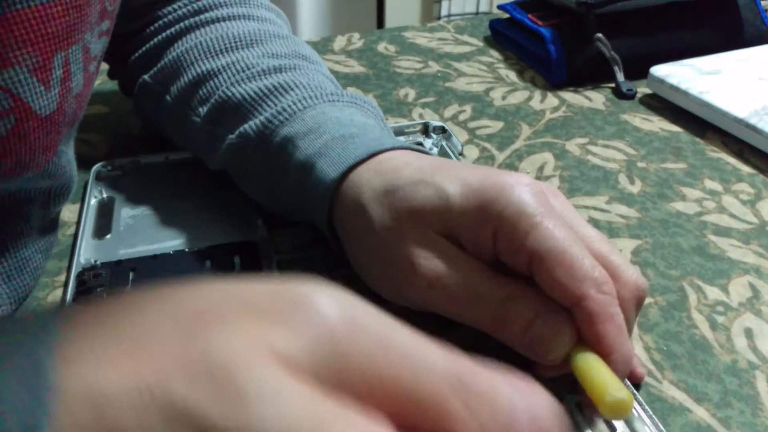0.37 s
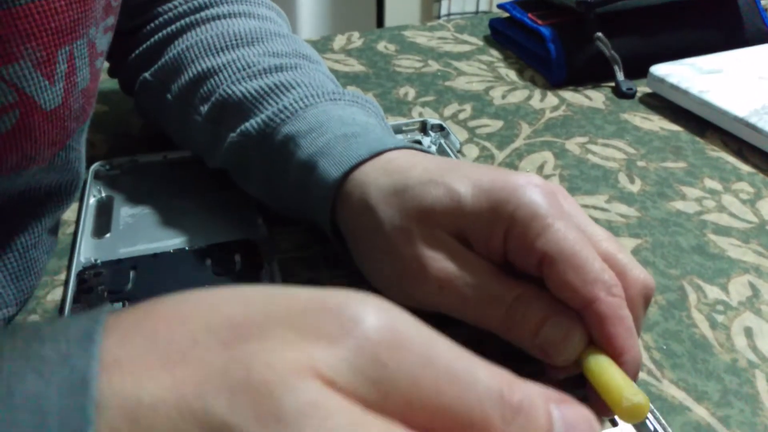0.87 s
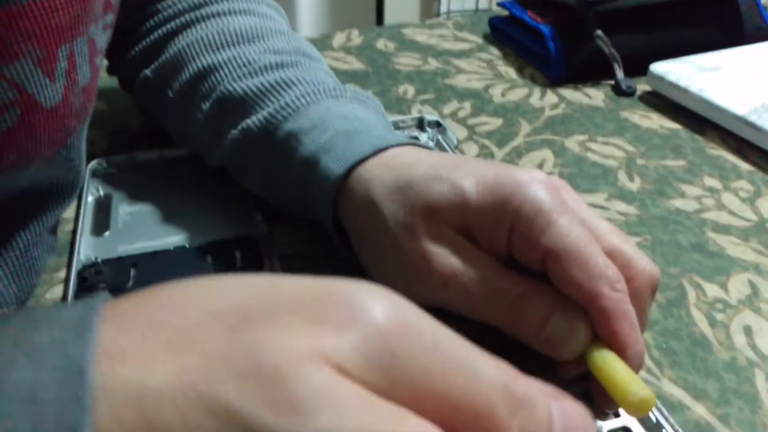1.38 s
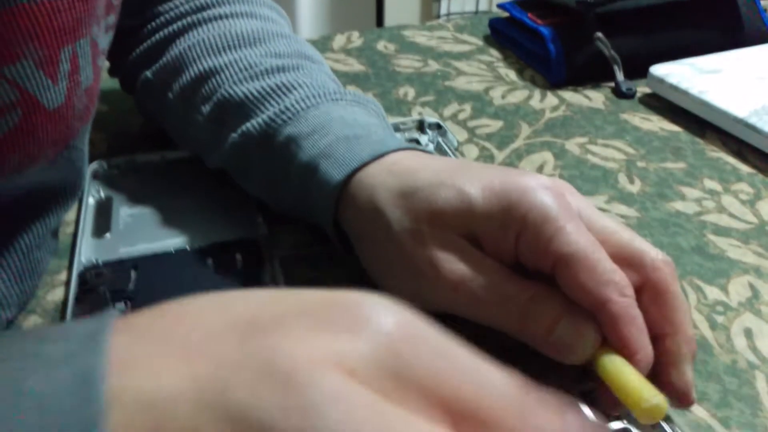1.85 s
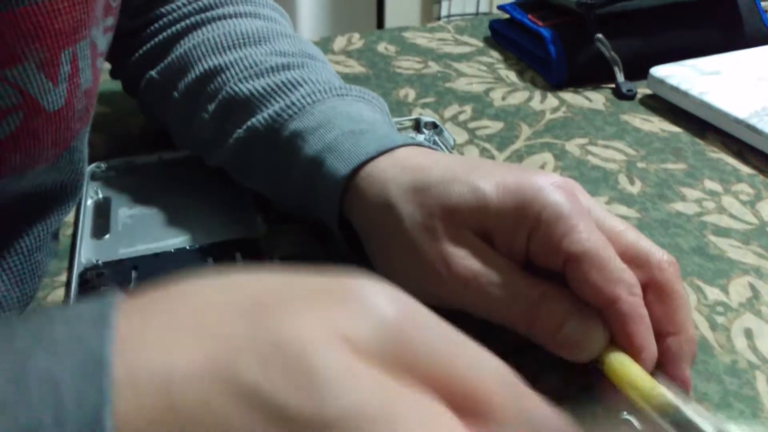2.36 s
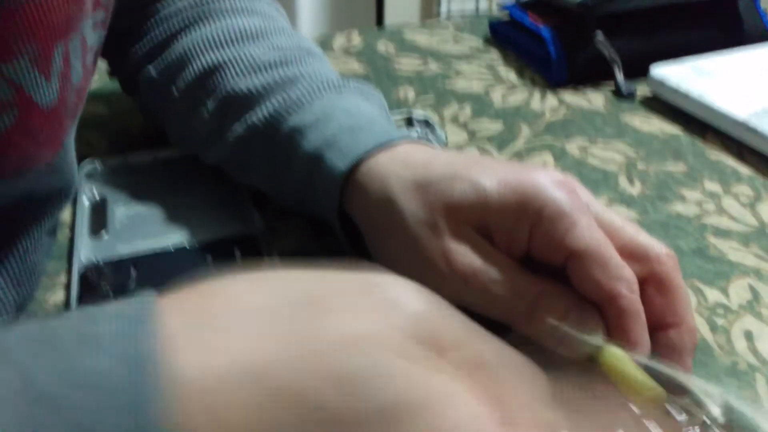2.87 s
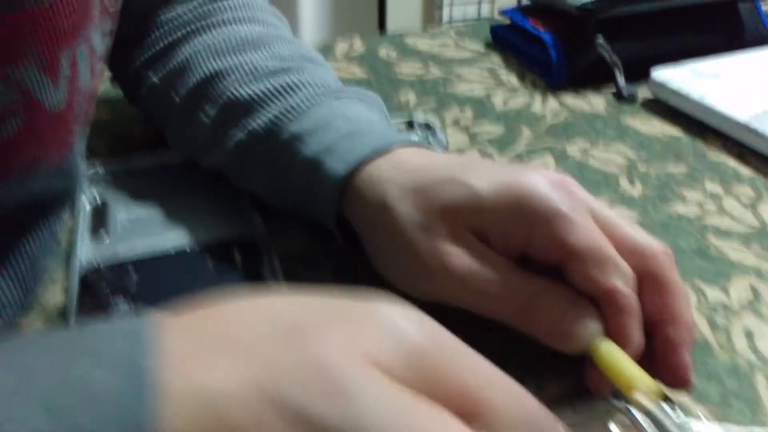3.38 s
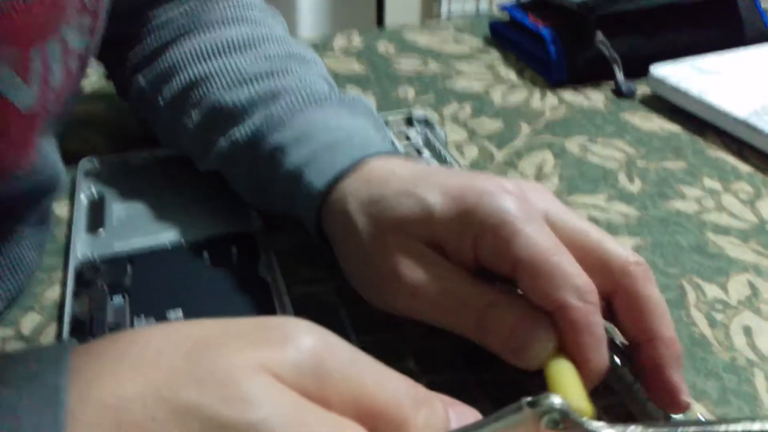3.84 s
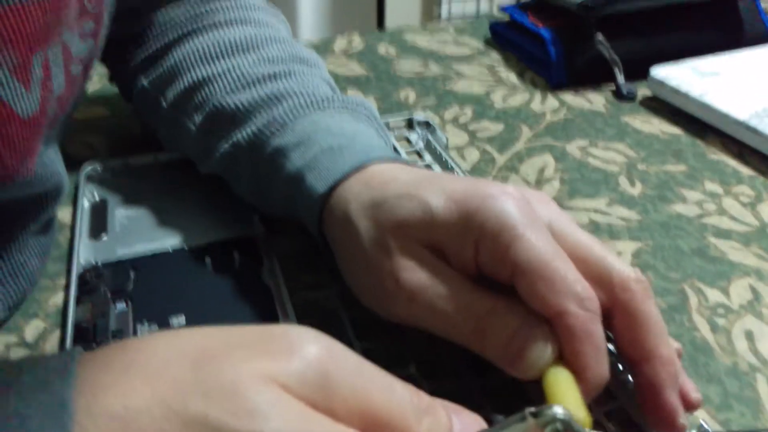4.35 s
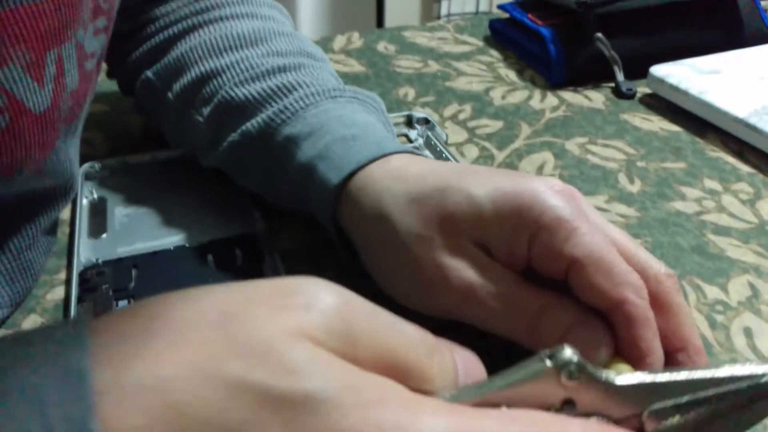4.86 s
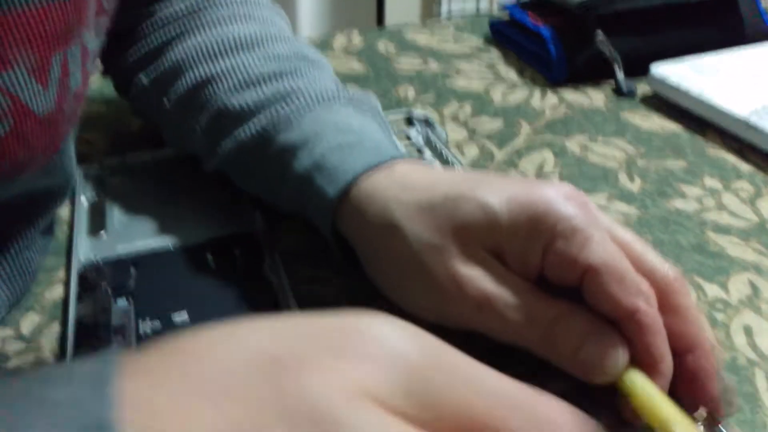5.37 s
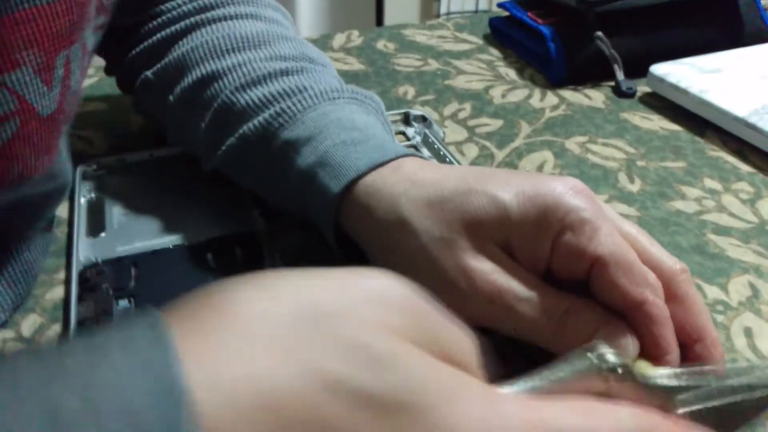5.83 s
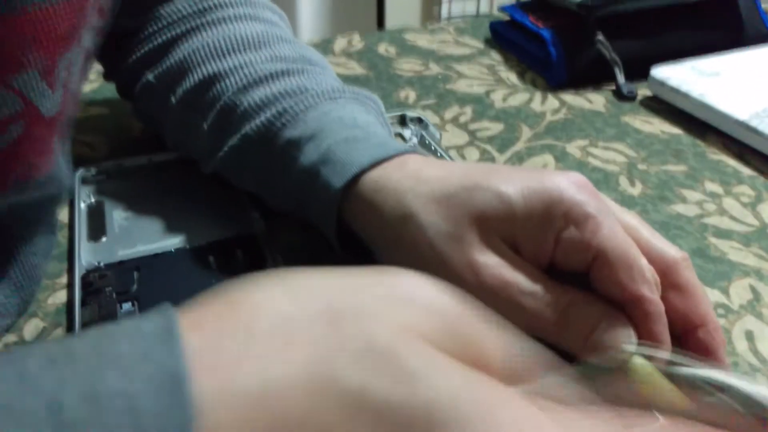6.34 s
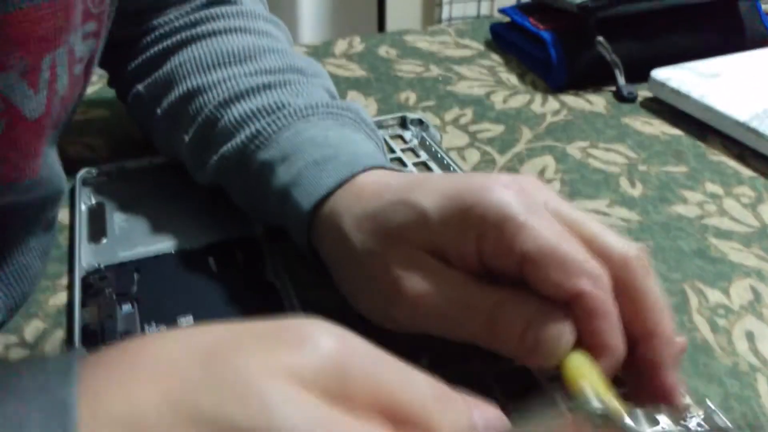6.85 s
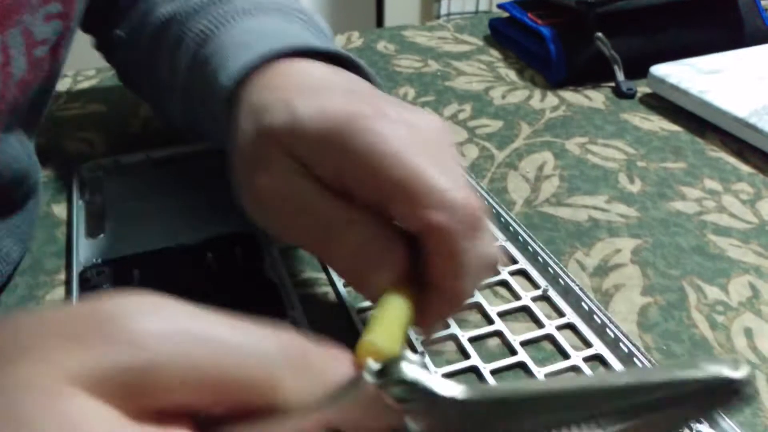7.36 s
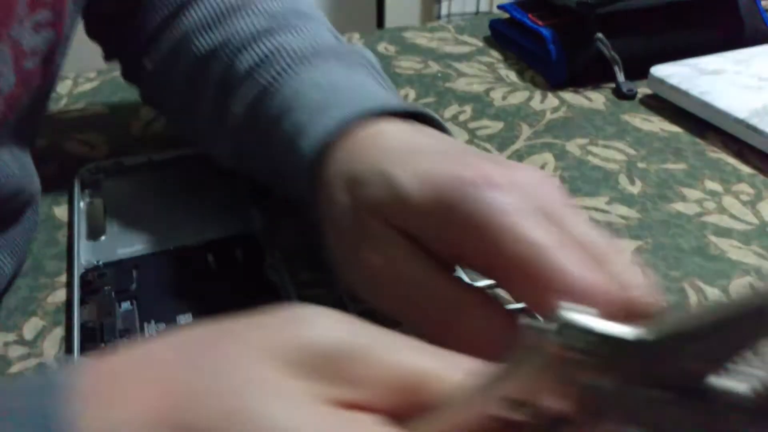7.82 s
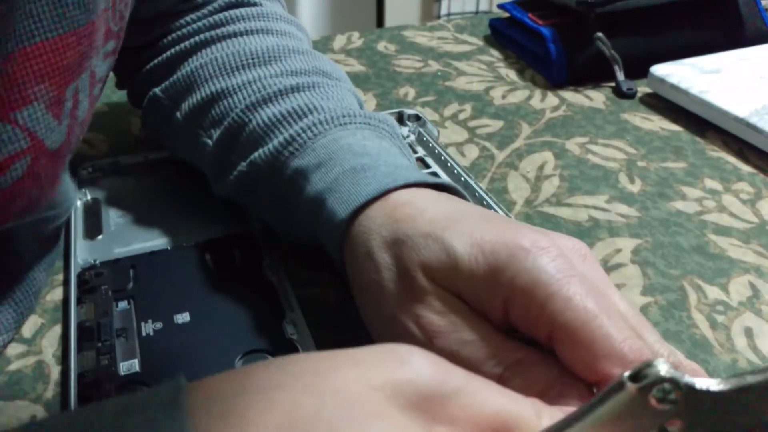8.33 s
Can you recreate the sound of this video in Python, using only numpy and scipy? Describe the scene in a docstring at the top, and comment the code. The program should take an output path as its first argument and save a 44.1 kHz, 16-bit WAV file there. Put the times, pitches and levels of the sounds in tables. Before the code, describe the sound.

Sharp close blows of steel on steel over a cloth-covered table, first spaced, then quickening, a quiet fiddling gap, then four more in a small room.

```python
"""Pliers hammering a punch

Pliers hammer a punch against the rivets of a metal case that lies on a cloth-covered table in a small room.
Each blow is a bright crack, a thud of case and table a moment later and a thin ring of the pliers.
Light clicks and scuffs of handling lie between, over rumble, hiss and hum. Clicks excite decaying modes,
shaped noise makes air and room. The left microphone faces the work; gain control and limiter hold the blows."""
import sys
import numpy as np
from scipy import signal
from scipy.io import wavfile
from scipy.ndimage import uniform_filter1d, minimum_filter1d

SR = 44100
rng = np.random.default_rng(int(sys.argv[2]) if len(sys.argv) > 2 else 0)


def boost_factor(decibels):
    """Convert a level in decibels to a linear amplitude factor."""
    exponent = np.asarray(decibels, float) / 20
    return 10 ** exponent


def unload_wav(signal):
    """Save mono or channel-first audio to the path in sys.argv[1] as 16-bit WAV at rate SR, clipped to [-1, 1]."""
    wavfile.write(
        sys.argv[1],
        SR,
        np.round(np.clip(np.atleast_2d(signal).T, -1, 1) * 32767).astype(np.int16),
    )


N = 373527   # length in samples


def rms_one(x):
    """Scales a sound to an rms of 1."""
    return x / np.sqrt(np.mean(x ** 2) + 1e-20)


def at_hz(points, hz):
    """Reads a curve between its points, along a logarithmic pitch axis."""
    points_hz, values = np.transpose(points)
    return np.interp(np.log(hz), np.log(points_hz), values)


def low_pass(x, hz):
    """Dulls a sound above hz."""
    return signal.sosfilt(signal.butter(2, min(hz, 0.45 * SR), fs=SR, output="sos"), x)


def high_pass(x, hz, order):
    """Thins a sound below hz."""
    return signal.sosfilt(signal.butter(order, hz, "high", fs=SR, output="sos"), x)


def band_pass(x, low_hz, high_hz):
    """Keeps one band of a sound."""
    return signal.sosfilt(signal.butter(2, [low_hz, high_hz], "band", fs=SR, output="sos"), x)


def ring(excitation, hz, t60_s):
    """A resonance: a unit click sets a sine of height 1 ringing, which falls 60 dB in t60_s."""
    decay = boost_factor(-60 / (t60_s * SR))
    turn = 2 * np.pi * hz / SR
    return signal.lfilter([0, np.sin(turn)], [1, -2 * decay * np.cos(turn), decay ** 2], excitation + 1e-18)


def bands(length):
    """Third-octave bands of noise, each an unrelated pair."""
    edges = 20 * 2 ** np.arange(0, 10, 1 / 3)
    white = rng.standard_normal((2, 2, length))
    for k, (low, high) in enumerate(zip(edges, edges[1:])):
        yield np.sqrt(low * high), band_pass(white[k % 2], low, high)


def alike(pair, likeness):
    """Two noises become left and right, 0 unrelated to 1 identical, as the close microphones make them."""
    likeness = np.clip(likeness, 0, 1)
    middle = np.sqrt(1 + likeness) * pair[0]
    side = np.sqrt(1 - likeness) * pair[1]
    return middle + side * [[1], [-1]]


# Colour of the rumble and hiss: pitch_hz [Hz], density_db [relative dB per Hz]
AIR_COLOUR = [(26, -43.5), (45, -7.5), (67, -9), (96, -16.5), (136, -11.5), (264, -20), (401, -21.5),
              (741, -27.5), (996, -27.5), (4240, -36.5), (11600, -39), (14900, -39.5), (16000, -45)]
# Left-right likeness of the rumble and hiss: pitch_hz [Hz], likeness [below 0 plays as 0]
AIR_LIKENESS = [(60, -2.5), (180, 1), (550, -0.44), (1650, 0), (4970, -0.63), (15000, -0.38)]
# The room's low resonances in the rumble: pitch_hz [Hz], width_hz [Hz], level_db [dB rms before right_gain_db]
ROOM_DRONE = [(123.2, 1.5, -66), (188, 10, -79.5), (231, 10, -77), (318, 21, -77.5)]
# Two steady tones that beat: pitch_hz [Hz], level_db [dB rms before right_gain_db]
BEATING_HUM = [(51, -67), (61, -68.5)]


def air():
    """Rumble of the house and hiss are coloured noise; noise-driven resonances drone and two sines beat."""
    air_db = -64.5   # rms of rumble and hiss
    warm_up = SR     # samples in which the filters settle, cut off afterwards
    noise = np.zeros((2, N + warm_up))
    for hz, pair in bands(N + warm_up):
        if hz > 40:
            noise += alike(pair, at_hz(AIR_LIKENESS, hz)) * boost_factor(at_hz(AIR_COLOUR, hz))
    drone = np.zeros(N)
    for hz, width_hz, db in ROOM_DRONE:
        t60_s = np.log(1000) / np.pi / width_hz
        drone += boost_factor(db) * rms_one(ring(rng.standard_normal(N + warm_up), hz, t60_s)[warm_up:])
    hum = np.zeros(N)
    t = np.arange(N) / SR
    for hz, db in BEATING_HUM:
        hum += np.sqrt(2) * boost_factor(db) * np.sin(2 * np.pi * (hz * t + rng.random()))
    return boost_factor(air_db) * rms_one(noise[:, warm_up:]) + drone + hum


# Reverberation time: pitch_hz [Hz], t60_s [s]
ROOM_DECAY = [(60, 0.13), (160, 0.41), (420, 0.34), (1100, 0.37), (2900, 0.33), (7700, 0.36),
              (15000, 0.029)]
# Colour of the reflections: pitch_hz [Hz], level_db [relative dB]
ROOM_TONE = [(60, -14.5), (125, -1.5), (158, -9), (200, 1), (300, 2), (500, 2.5), (1000, 1), (2000, 2),
             (4500, -3.5), (6000, -10.5), (9000, -4.5), (15000, -8.5)]
# Left-right likeness of the reflections: pitch_hz [Hz], likeness [0 to 1]
ROOM_WIDTH = [(60, 0.98), (150, 1), (300, 1), (600, 0.63), (1200, 0.17), (15000, 0.088)]


def room(x):
    """Reflections thicken within a few ms, then each band of the noise echo dies at its own rate."""
    build_s, room_db = 0.0008, 8   # rise of the echo, its energy against the sound sent in
    t = np.arange(SR // 2) / SR
    echo = np.zeros((2, len(t)))
    for hz, pair in bands(len(t)):
        level_db = at_hz(ROOM_TONE, hz) - 60 * t / at_hz(ROOM_DECAY, hz)
        echo += alike(pair, at_hz(ROOM_WIDTH, hz)) * boost_factor(level_db)
    echo *= 1 - np.exp(-(t / build_s) ** 2)
    echo = boost_factor(room_db) * rms_one(echo) / np.sqrt(len(t))
    return signal.fftconvolve(x[None], echo, axes=1)[:, :N]


def far_side(x):
    """The right microphone hears the work later and duller."""
    lag_s, shadow_hz = 0.0001, 2370
    shadow_db, treble_db = -1, -17   # level, and full-range sound let past the dull part
    late = np.interp(np.arange(N) - lag_s * SR, np.arange(N), x)
    return boost_factor(shadow_db) * (low_pass(late, shadow_hz) + boost_factor(treble_db) * late)


# Scuffs of the punch and the hand along the case:
# start_s [s], length_s [s], level_db [dB, grain level at the start], pitch_hz [centre, Hz]
RUBS = [(3.752, 0.12, -70, 520), (3.81, 0.069, -65, 1500), (3.749, 0.13, -65, 4300),
        (4.18, 0.066, -67, 517), (4.369, 0.05, -59, 1220), (4.697, 0.084, -62, 2900),
        (4.909, .07, -59.5, 2700), (6.574, 0.053, -54.5, 2860), (7.078, 0.037, -53, 2570),
        (8.197, 0.049, -65, 1066), (8.275, 0.041, -73, 1070)]


def scuffs():
    """Dense grains fade over each rub and ring a few cycles at its pitch."""
    grains_per_s, fade_db, room_send_db = 1500.0, 11, -10
    ring_cycles = 5.1   # cycles until the ring has fallen 60 dB
    t = np.arange(N) / SR
    grains = rng.standard_normal(N) * (rng.random(N) < grains_per_s / SR)
    out = np.zeros(N)
    for start_s, length_s, db, hz in RUBS:
        progress = (t - start_s) / length_s
        rubbing = (progress >= 0) & (progress < 1)
        stroke = rubbing * boost_factor(db - fade_db * np.clip(progress, 0, 1))
        out += ring(grains * stroke, hz, ring_cycles / hz)
    return np.array([out, boost_factor(room_send_db) * out])


def clicks(times, db):
    """One-sample impulses at the given times and levels."""
    out = np.zeros(N)
    np.add.at(out, np.round(times * SR).astype(int), boost_factor(db))
    return out


def chatter(times, db, length_s, count):
    """A contact is a first tick and weaker ones close behind, the later the weaker."""
    delay = rng.random((len(times), count)) * (np.arange(count) > 0)
    tick_times = times[:, None] + delay * length_s
    tick_db = db[:, None] - 11 * delay
    return tick_times.ravel(), tick_db.ravel()


def strike(times, db, modes, swing=-1):
    """Each contact gives each mode its own strength; swing -1 starts neighbouring modes in opposite sense."""
    luck_db = 2 * rng.standard_normal((len(times), len(modes)))
    out = np.zeros(N)
    for k, (hz, mode_db, t60_s) in enumerate(modes):
        out += swing ** k * ring(clicks(times, db + mode_db + luck_db[:, k]), hz, t60_s)
    return out


def ringing(times, db, favoured_hz, modes):
    """Long modes, strongest near the favoured pitch; the next contact in the list stops them."""
    favour_db, favour_octaves, luck_db = 8, 0.04, 3
    luck = rng.standard_normal((len(times), len(modes)))
    t = np.arange(N) / SR
    hz, mode_db, t60_s = np.transpose(modes)[:, :, None]
    out = np.zeros(N)
    for k, (start, stop) in enumerate(zip(times, np.append(times[1:], t[-1]))):
        now = (t >= start) & (t < stop)
        age = t[now] - start
        favour = np.exp(-(np.log2(hz / favoured_hz[k]) / favour_octaves) ** 2)
        level_db = db[k] + mode_db + favour_db * favour + luck_db * luck[k][:, None] - 60 * age / t60_s
        out[now] = np.sum(boost_factor(level_db) * np.sin(2 * np.pi * hz * age), axis=0)
    return out


# Modes of each thud, case and table together with the room's low resonances near 128 and 191 Hz: pitch_hz [Hz],
# level_db [relative dB], t60_s [s]
THUD_MODES = [(127.5, -5, 0.16), (191.4, -10.5, 0.22), (271.9, -9, 0.18), (297.7, -10.5, 0.19),
              (367, -3.5, 0.028), (499, 6.5, 0.014), (573, -9.5, 0.063), (640, 3, 0.012),
              (766.2, -17, 0.35), (885, -7, 0.017)]


def thud(times, db):
    """Case, table and the room's low resonances answer late, all modes in one push through a soft contact, with
    little air moved low down."""
    lag_s, contact_hz, floor_hz = 0.00092, 1800, 131
    push = strike(times + lag_s, db, THUD_MODES, swing=1)
    return high_pass(low_pass(push, contact_hz), floor_hz, order=3)


# Short modes of the steel tools: pitch_hz [Hz], level_db [relative dB], t60_s [s]
STEEL_MODES = [(4080, 3.5, 0.003), (5040, 11, 0.0039), (5780, 0.5, 0.012), (6670, 4.5, 0.0048),
               (8133, 8.5, 0.0034), (9350, 10.5, 0.0024), (10670, -2.5, 0.009), (11550, 3, 0.0026),
               (13500, 4.5, 0.0015)]
# Short modes of the metal case: pitch_hz [Hz], level_db [relative dB], t60_s [s]
CASE_MODES = [(1140, 0.5, 0.009), (1610, 4.5, 0.01), (1880, 1.15, 0.012), (2390, 2.5, 0.021),
              (2710, -1.5, 0.024), (3200, 3.5, 0.011), (3980, 0.5, .005)]
# What table, case and steel send into the room, one row each: low_hz [Hz], high_hz [Hz]
ROOM_BANDS = [(90, 900), (900, 4000), (4000, 16000)]


def contacts(times, thud_db, case_db, steel_db, chatter_s):
    """Tools tick, case clacks, table thuds; summed over all directions the room gets a smoother spectrum."""
    modes_to_room_db = -29
    steel = strike(*chatter(times, steel_db, chatter_s, count=6), STEEL_MODES)
    case = strike(*chatter(times, case_db, chatter_s, count=6), CASE_MODES)
    spread = boost_factor(modes_to_room_db) * (steel + case)
    for k, ((low, high), db) in enumerate(zip(ROOM_BANDS, (thud_db, case_db, steel_db))):
        burst = band_pass(clicks(times, db) + 1e-18, low, high) * np.sqrt(SR / (high - low))
        spread += (-1) ** k * burst   # opposite sense keeps the borders between bands filled
    return np.array([steel + case + thud(times, thud_db), spread])


# Light touches while the tools are handled:
# start_s [s], case_db [dB, before mode levels], hardness_db [dB, steel above the case]
LIGHT_TOUCHES = [(0.176, -62, 2.5), (1.866, -59.5, 5), (2.207, -59, 5.5), (2.47, -59.5, 1.5),
                 (2.695, -60.5, 6), (3.398, -57, -20), (3.413, -61, -18), (3.43, -59.5, -3),
                 (3.444, -55, -3), (3.75, -61, 5.5), (3.799, -62.5, 0), (3.833, -61, 2), (3.849, -66, 2),
                 (4.099, -60.5, 5), (4.208, -66, 4), (4.375, -59.5, -8.5), (4.585, -69, 5.5),
                 (4.643, -58.5, -3.5), (4.706, -53.5, -15.5), (4.767, -62.5, -14.5), (4.916, -63.5, -4),
                 (4.987, -75, 7.5), (5.429, -59, 2.5), (5.792, -70, 2.5), (6.039, -56.5, 5),
                 (6.252, -56, 4.5), (6.325, -32, 9), (6.451, -49.5, -8), (6.592, -58.5, 1.5),
                 (7.083, -63, -4.5), (7.37, -67.5, 6.5), (8.184, -49.5, 2), (8.191, -50.5, 3.5),
                 (8.199, -53.5, -1)]
# Long modes of the case, for clinks here and clangs in the blows:
# pitch_hz [Hz], level_db [relative dB], t60_s [s]
CLANG_MODES = [(2250, -40, .17), (2955, -42, .28), (3052, -39, .3), (3150, -38, .25), (3300, -41, .25),
               (3962, -44, .3), (4200, -44, .26), (4900, -45, .3), (5500, -45, .3)]


def touches():
    """Small contacts on the same bodies: hard ones tick and clink, soft ones knock."""
    chatter_s, thud_above_case_db = 0.0075, -4
    thud_per_softness = 0.6             # dB of thud per dB of softness
    clink_db, clink_hz = 22, 4200       # above the steel, before mode levels; favoured pitch
    start_s, case_db, hardness_db = np.transpose(LIGHT_TOUCHES)
    thud_db = case_db + thud_above_case_db - thud_per_softness * hardness_db
    steel_db = case_db + hardness_db
    direct, spread = contacts(start_s, thud_db, case_db, steel_db, chatter_s)
    clink = ringing(start_s, steel_db + clink_db, np.full(len(start_s), clink_hz), CLANG_MODES)
    return np.array([direct + clink, spread])


# Blows: start_s [s], thud_db [dB, before mode levels], case_db [dB, before mode levels],
# steel_db [dB above the case], pitch_hz [Hz, favoured by the struck spot]
HAMMER_BLOWS = [(0.5512, -11, -10, -6, 7140), (1.0433, -9, -5.5, -8, 6516), (1.917, -12, -21, -6, 6407),
                (2.2508, -10, -8, -3, 4026), (2.5135, -9.5, -9.5, -2.5, 7190),
                (2.7367, -9.5, -11.5, -8.5, 6840), (2.933, -15.5, -13, -5, 6850),
                (3.1948, -28.5, -25.5, 2, 3190), (5.5791, -15, -15, -6, 7157),
                (5.8508, -13, -15, -10, 7157), (6.0815, -9.5, -13.5, -3, 7080),
                (6.287, -11.5, -7, -9, 6890)]
# Long modes of the pliers: pitch_hz [Hz], level_db [relative dB], t60_s [s]
PLIERS_MODES = [(6164, -59, .5), (6533, -63, 1.1), (6829, -61, 1.1), (6865, -66, 1.0), (7157, -62, 1.4),
                (8100, -60, .3), (9660, -62, .5), (10900, -58, .25), (11750, -60, .35), (12500, -60, .3)]


def blows():
    """Pliers on the punch chatter a few ms and ring on thinly; a glancing steely blow makes the case clang."""
    chatter_s, clang_to_room_db = 0.007, -16.5
    ring_db, ring_follows = -5, 0.45        # at average thud, before mode levels; share of the thud's swing
    clang_db, clang_follows = 13.5, 1.7     # above the case, before mode levels; dB per dB of steel
    start_s, thud_db, case_db, steel_db, pitch_hz = np.transpose(HAMMER_BLOWS)
    direct, spread = contacts(start_s, thud_db, case_db, case_db + steel_db, chatter_s)
    pliers_db = ring_db + ring_follows * (thud_db - thud_db.mean())
    pliers = ringing(start_s, pliers_db, pitch_hz, PLIERS_MODES)
    clang = ringing(start_s, case_db + clang_db + clang_follows * steel_db, pitch_hz, CLANG_MODES)
    return np.array([direct + pliers + clang, spread + boost_factor(clang_to_room_db) * clang])


def scene():
    """The work reaches both microphones directly and through the room, over the air of the house."""
    mic_floor_hz, right_gain_db = 40.2, -1.4
    direct, spread = blows() + touches() + scuffs()
    heard = np.array([direct, far_side(direct)]) + room(spread)
    heard = high_pass(heard, mic_floor_hz, order=2) + air()
    return heard * boost_factor([[0], [right_gain_db]])


def over_ceiling(x):
    """How many dB the louder channel stands above the ceiling."""
    ceiling_db = -1
    return np.maximum(20 * np.log10(np.abs(x).max(axis=0) + 1e-9) - ceiling_db, 0)


def top_cut(x):
    """Nothing passes above the cut-off."""
    return signal.sosfilt(signal.butter(12, 16830, fs=SR, output="sos"), x)


def record(dry):
    """Gain control ducks a few ms after each loud blow, lets go steadily; a quick limiter catches first peaks."""
    attack_s, release_db_per_s = 0.0035, 146
    ramp = release_db_per_s * np.arange(N) / SR
    held_db = np.maximum.accumulate(over_ceiling(dry) + ramp) - ramp
    smooth = np.exp(-1 / (attack_s * SR))
    duck_db = signal.lfilter([1 - smooth], [1, -smooth], held_db)
    ducked = dry * boost_factor(-duck_db)
    # the limiter takes the highest peak nearby, ahead as well as behind, and rounds its gain
    peak_db = -minimum_filter1d(-over_ceiling(ducked), size=65)
    limit_db = uniform_filter1d(peak_db, size=33)
    return top_cut(ducked * boost_factor(-limit_db))


dry = scene()
out = record(dry)
unload_wav(out)
```